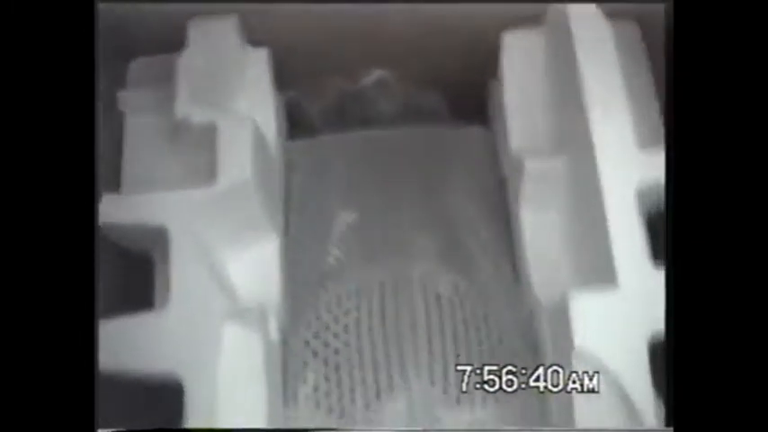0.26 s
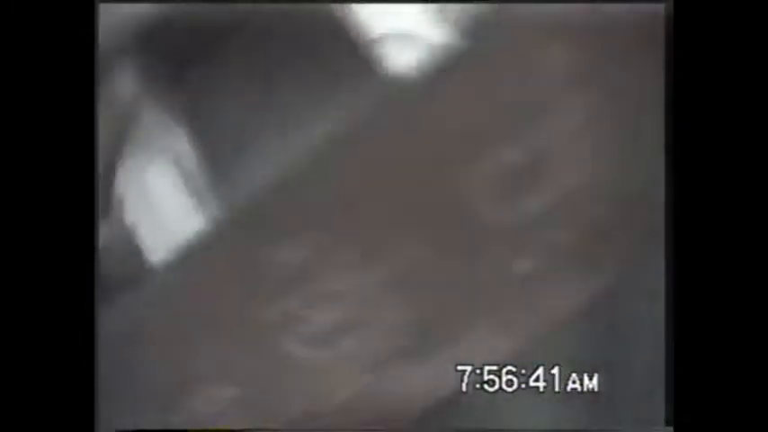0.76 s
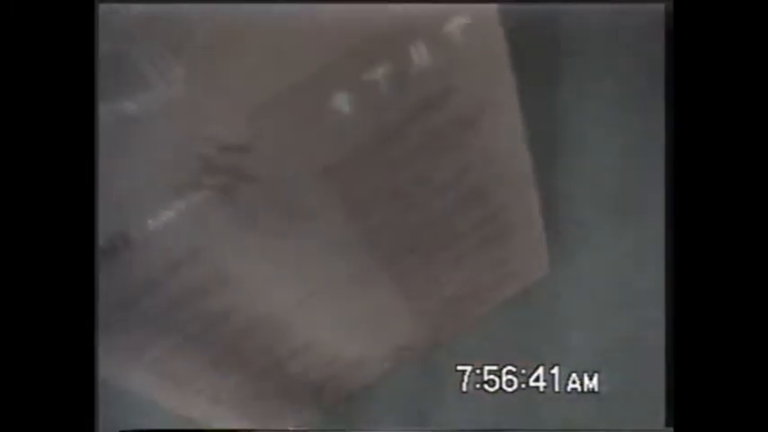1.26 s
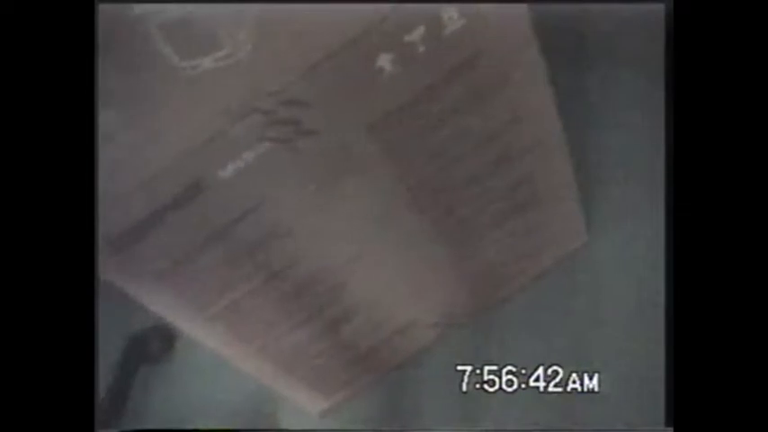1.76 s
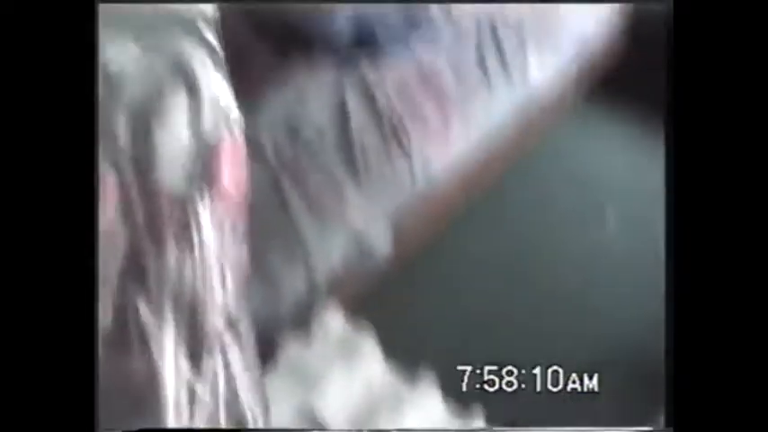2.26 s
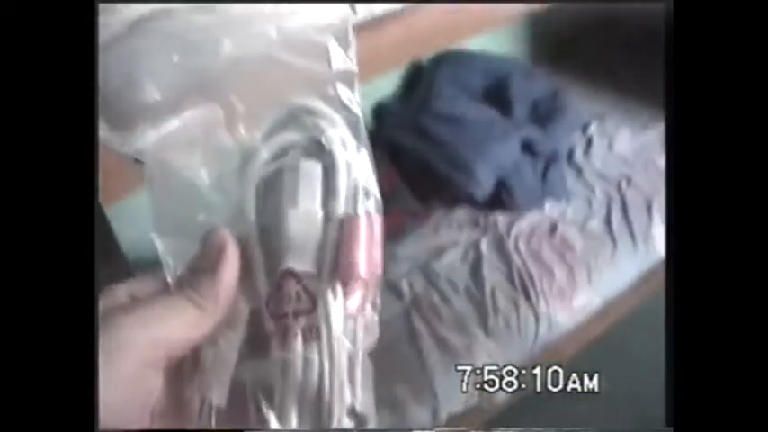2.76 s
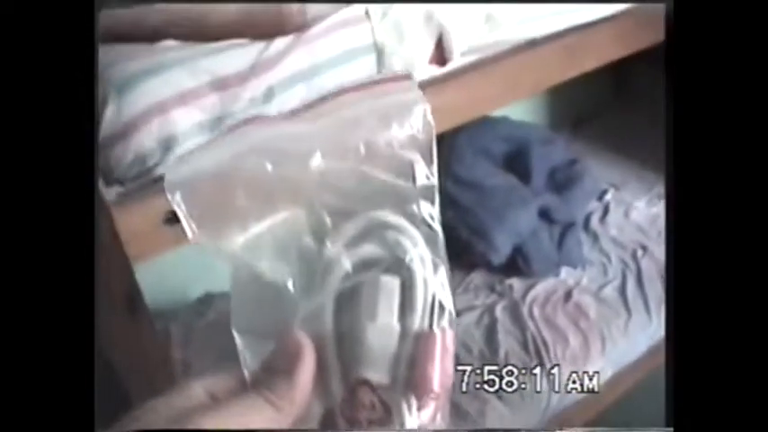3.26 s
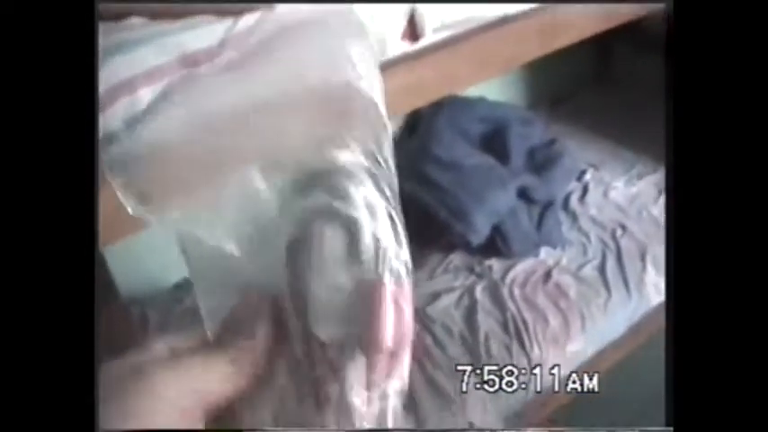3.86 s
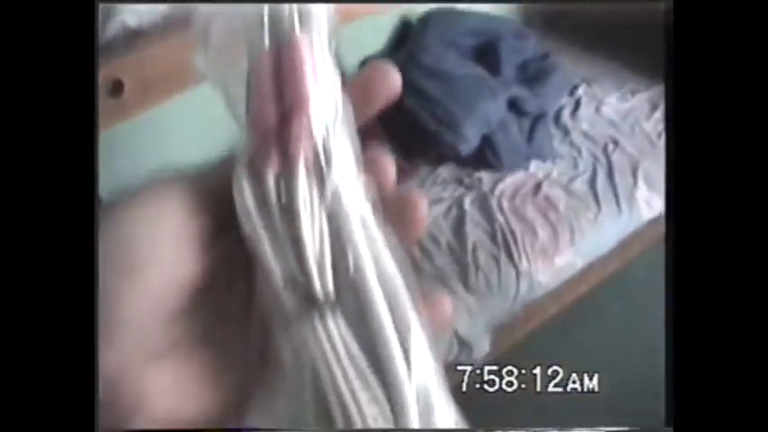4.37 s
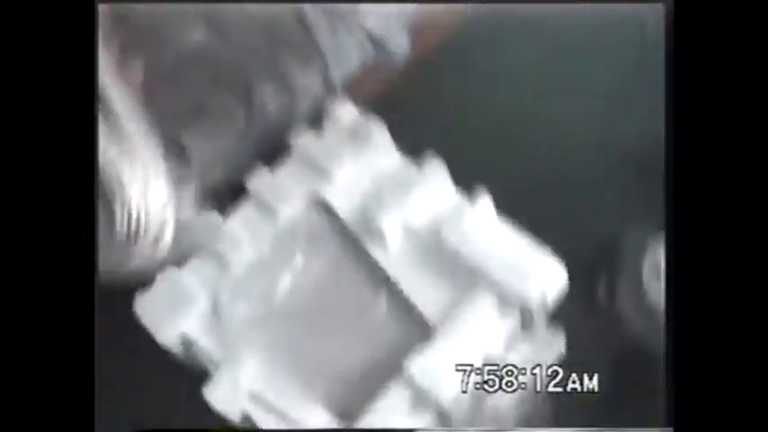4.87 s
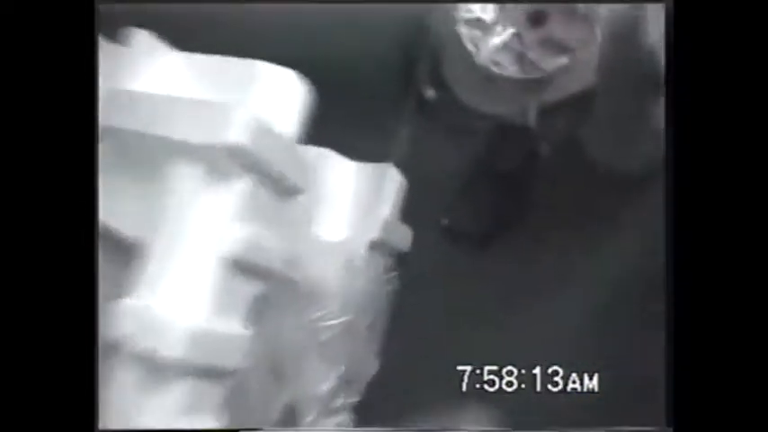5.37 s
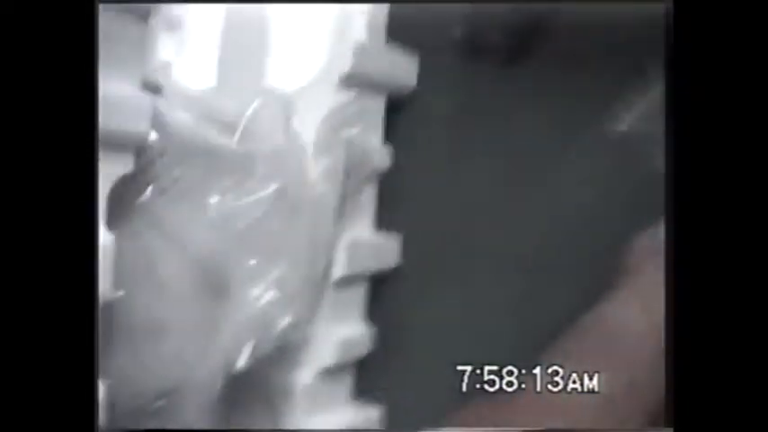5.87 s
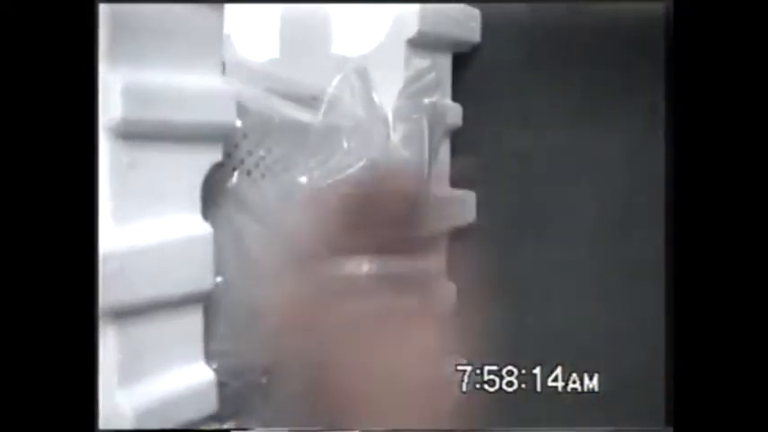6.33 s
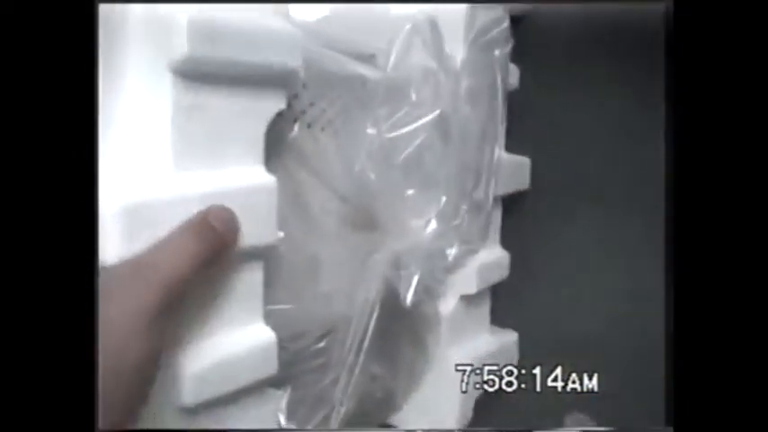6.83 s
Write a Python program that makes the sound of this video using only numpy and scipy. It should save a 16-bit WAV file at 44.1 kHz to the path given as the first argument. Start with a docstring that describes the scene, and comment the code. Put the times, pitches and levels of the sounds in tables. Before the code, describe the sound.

Close handling in a dead bedroom: hissy foam rubs, crisp plastic crinkles in bursts, small hollow foam knocks, with camera hum beneath, right side only.

```python
"""In a short, dead bedroom, hands unpack foam blocks, a cardboard box and a plastic bag of cables near a camcorder.
Random slips drive foam hiss, bag crinkle and dull box scrapes; cracks of shaped noise make the bag snap.
Decaying modes make hollow block thuds, swelling low tones the soft bumps, wavering lines the drive whine.
One microphone feeds the right channel, which carries a fixed offset; the left holds only crackly line hiss."""
import sys
import numpy as np
from scipy import signal
from scipy.fft import rfft, irfft
from scipy.io import wavfile
from scipy.ndimage import uniform_filter1d

SR = 44100
rng = np.random.default_rng(int(sys.argv[2]) if len(sys.argv) > 2 else 0)


def nominal_scale(level):
    """Amplitude ratio for a level in decibels (scalar or array-like)."""
    x = np.asarray(level, float) / 20
    return 10 ** x


def inscribe(sig):
    """Save sig as 16-bit PCM at rate SR to the path in sys.argv[1].

    A 1-D sig is mono; a 2-D sig holds one channel per row.
    Samples are clipped to [-1, 1] before scaling.
    """
    pcm = np.round(np.clip(np.atleast_2d(sig).T, -1, 1) * 32767)
    wavfile.write(sys.argv[1], SR, pcm.astype(np.int16))


N = 313110

# Source levels are those of one side, before the two equal sides sum.
# Spectra, relative: f/Hz, level/dB
LINE_SPECTRUM = [(20, -28), (60, -51), (120, -6), (600, -23), (2000, -7), (5000, 2.5), (9000, 4),
                 (16000, 5)]  # open left input
ROOM_SPECTRUM = [(12, 8), (60, 0.5), (96, -2), (125, -16.5), (170, -21.5), (250, -10.5), (400, -17),
                 (700, -26), (1500, -16.5), (2400, -30.5), (3100, -24.5), (5000, -56), (12000, -26),
                 (16000, -27)]  # even rumble and hiss
TICK_SPECTRUM = [(120, -26), (230, 4), (400, 1.5), (1500, -5.5), (4000, -19)]  # faint low ticks of the mechanism
BRIGHT_FOAM_SPECTRUM = [(1500, -17), (3000, -7), (3900, 4.5), (4900, 3), (7500, 9), (10000, 7.5),
                        (11500, 2.5), (13000, 0.5), (15800, -8)]  # foam near by
DULL_FOAM_SPECTRUM = [(1500, -8.5), (4000, -12.5), (4800, 3), (6500, 3), (9500, 5.5), (11200, -1.5),
                      (12200, -3.5), (16000, -14)]  # duller foam, its treble ending lower
FILM_SPECTRUM = [(1500, -30), (3000, -6), (4900, 3), (7500, 7.5), (10000, 3.5), (11500, -1.5), (12600, -9),
                 (16000, -24)]  # treble of the bag
BAG_SPECTRUM = [(500, -20), (1100, 2), (2000, 4.5), (3500, 4), (5000, 2), (9000, -9.5), (15000, -30)]  # mid body of the squeezes
CARD_SPECTRUM = [(250, -23), (450, 10), (1100, 12.5), (2000, 9.5), (3500, 9.5), (6000, 7), (9000, -35)]  # mid body of the rubs
BOX_SPECTRUM = [(60, -14), (120, -4.5), (190, 2), (330, 5), (700, 6.5), (1200, -2.5), (2500, -41.5)]  # dull scrape of the box
# Modes of the hollow block, before the pitch factor: f/Hz, level/dB
BLOCK_MODES = [(150, -9), (230, 1), (320, -2.5), (420, 0), (700, -2)]
# Lines of the tape drive: f/Hz
WHINE_HZ = [1078, 1620, 3036]
# Slow swell of the whine: t/s, then level/dB of each line
WHINE_SWELL = [(0, -66, -71.5, -83), (1.5, -70, -71, -75), (2.6, -70.5, -71.5, -75.5),
               (3.5, -73.5, -70, -74.5), (4.2, -74, -73, -70), (4.55, -72, -70, -77.5),
               (5.9, -80, -71.5, -75), (7.1, -77, -81, -83)]
# Soft low bumps of the hand on the camcorder or bag: centre t/s, level/dB, f/Hz
BUMPS = [(0.546, -51.5, 250), (1.832, -59, 271), (1.93, -55, 197), (2.188, -55, 217), (2.325, -51.5, 130),
         (2.369, -61, 171), (3.647, -46, 159), (3.697, -54, 200), (3.724, -51, 187), (3.849, -51.5, 226),
         (3.862, -46, 152), (3.886, -49, 197), (4.051, -51.5, 175), (4.086, -54, 159)]
# Foam blocks set down or bumped: t/s, level/dB, t60/s of the 230 Hz mode, pitch factor (higher: smaller block)
THUDS = [(0.576, -37.5, 0.034, 2.58), (1.911, -40.5, 0.019, 2.13), (2.138, -43.5, 0.054, 1.27),
         (5.535, -27, 0.0053, 2.7), (6.216, -34.5, 0.041, 1.28), (6.233, -42.5, 0.2, 0.95),
         (6.528, -43, 0.026, 2.7), (7.002, -37, 0.043, 1.32)]
# Creases of the bag popping: t/s, crack peak level/dB, centre f/Hz,
# floor level/dB below and above the centre, relative to it (positive counts as 0)
SNAPS = [(2.054, -36.5, 950, -6, -40), (2.0668, -39, 4380, 3, -25), (2.0785, -39, 1240, 1, -21),
         (2.138, -34.5, 1730, -12, -10), (2.147, -40, 1550, -12, -5), (2.171, -41, 8030, -5, -10),
         (2.3466, -30, 8960, -2.5, -10), (2.371, -33, 5770, 3, -17), (2.633, -53, 1100, -12, -8),
         (2.6407, -40, 1930, -14, -16), (2.679, -34.5, 1930, -8, -21), (2.684, -36.5, 2100, 2, -20),
         (2.7034, -52, 2680, -8, -14), (2.7313, -40, 6640, 9, -25), (2.7333, -25.5, 3850, 6, -32),
         (2.7738, -38, 890, -10, -20), (2.8188, -29.5, 2600, 0, -5), (3.009, -39.5, 1910, 1, -14),
         (3.454, -40.5, 1600, -1, -11), (3.5957, -33, 980, 1, -22), (3.6106, -27, 5700, -4, 3),
         (3.6145, -27.5, 8960, -1, -10), (3.6242, -29, 4640, 0, -7), (3.627, -34, 2680, -7, -5),
         (3.6374, -27, 7190, -10, -14), (3.65, -30, 10000, -6, -10), (3.655, -26, 8030, -4, -10),
         (3.661, -29, 1930, -4, -13), (3.6768, -23, 3720, 0, -6), (3.6869, -26.5, 6450, -2, -9),
         (3.6918, -46, 2400, -12, -12), (3.699, -34, 3720, 0, -14), (3.709, -25.5, 4200, -7, -11),
         (3.7188, -25, 4640, 0, -20), (3.7365, -27, 7840, -7, -10), (3.7493, -25, 2970, 0, -9),
         (3.805, -31, 7060, -1, -26), (3.8117, -26, 7140, 0, -21), (3.8413, -36, 1240, -8, -17),
         (3.854, -25, 2950, -7, -17), (3.865, -24.5, 3300, 1.5, -11), (3.8717, -27, 8960, -14, -10),
         (3.888, -25.5, 2620, -10, -21), (3.8987, -25.5, 2660, -2, -18), (3.9164, -27, 8850, -9, -10),
         (3.935, -27.5, 6450, 0, -17), (3.952, -37, 2150, -6, -15), (3.9576, -30, 3330, -8, -20),
         (3.9721, -24.5, 2990, -10, -5), (3.977, -27, 1970, -1.5, -25), (3.9806, -44, 1940, 1, -21),
         (4.0102, -29, 2400, -4, -8.5), (4.079, -28.5, 5860, -8, -1), (4.089, -24, 2650, 3.5, -12),
         (4.1022, -41, 886, -14, -27), (4.1062, -39, 6450, -5, -19), (4.1149, -29, 1930, -2, -2),
         (4.1694, -44, 1130, -18, -20), (4.4002, -46, 2680, 4, -20), (4.5159, -48, 1930, -15, -13),
         (4.7466, -37, 1730, -17, -21), (4.7567, -34.5, 2400, -16, -12), (4.9479, -33.5, 1680, -5, -28),
         (4.9522, -33, 4150, -1, -21), (4.976, -30, 1560, -17, -9), (5, -33.5, 4150, -12, -19),
         (5.0105, -46, 3720, -9, -8), (5.0125, -49, 4150, 0, -17), (5.024, -33, 2150, -13, -16),
         (5.0661, -35.5, 1390, -17, -21), (5.1115, -26, 2700, -15, -9), (5.1246, -46, 4640, -8, -5),
         (5.2117, -31, 1390, -14, -10), (5.218, -31, 5170, 0, -17), (5.237, -33, 3330, -20, -1),
         (5.2508, -30, 5600, -1, -3), (5.255, -30, 10000, -20, -10), (5.27, -26, 1950, -18, -19),
         (5.278, -29, 3000, -10, -11), (5.281, -28, 2150, -14, -14), (5.294, -30, 2150, -8, -14),
         (5.309, -34, 1240, -11, -12), (5.347, -27.5, 7190, 1, -22), (5.3662, -29.5, 8960, -9, -10),
         (5.377, -37, 2990, -3, -10), (5.3858, -28.5, 2670, 2, -12), (5.4555, -30.5, 7190, -8, -4),
         (5.4636, -26.5, 2430, -23, -27), (5.4969, -27, 7900, 1, -11), (5.5334, -26.5, 2860, -16, -20),
         (5.5817, -40, 1110, -17, -36), (5.6684, -29, 2680, -14, -15), (5.6996, -25, 4700, -10, -11),
         (5.781, -28, 2400, -12, 3), (5.839, -30, 3330, -4, -6.5), (6.2275, -32, 8140, -24, -8),
         (6.213, -37, 3900, -12, 1), (6.3653, -38, 8100, -9, -10), (6.595, -30.5, 6400, -6, -11)]
# Smooth rubs on foam and card: peak t/s, rise/s, fall/s, foam level/dB, card level/dB
RUBS = [(.1, 0.6, 0.25, -55, -54.5), (.46, 0.27, 0.12, -46.5, -46.5), (.74, 0.038, 0.033, -53, -56),
        (.86, 0.11, 0.076, -48, -58), (.97, 0.062, 0.087, -49, -56), (1.16, 0.13, 0.033, -59, -56.5),
        (1.27, 0.12, 0.07, -48, -49.5), (1.62, 0.24, 0.2, -54, -60), (6.222, 0.02, 0.023, -33, -41.5),
        (6.25, 0.067, 0.062, -49, -53.5), (6.378, 0.024, 0.081, -42, -60.5),
        (6.471, 0.026, 0.028, -38, -54.5), (6.54, 0.037, 0.028, -44.5, -58), (6.6, 0.017, 0.11, -44, -50),
        (6.73, 0.079, 0.04, -42, -44.5), (6.785, 0.14, 0.047, -34.5, -42.5), (6.83, 0.036, 0.058, -43, -50),
        (6.92, 0.16, 0.43, -42, -44.5), (7.03, 0.055, 0.062, -31, -42)]
# Coarse squeezes of the bag: peak t/s, rise/s, fall/s, film level/dB, bag level/dB
SQUEEZES = [(2.07, 0.063, 0.082, -80, -55.5), (2.16, 0.12, 0.029, -80, -57.5),
            (2.43, 0.053, 0.12, -78, -56), (2.64, 0.034, 0.02, -70, -53), (2.71, 0.083, 0.038, -58, -51.5),
            (2.745, 0.038, 0.068, -64, -53.5), (3.0, 0.011, 0.079, -55.5, -63),
            (3.62, 0.058, 0.022, -48, -48), (3.655, 0.016, 0.016, -50, -42),
            (3.695, 0.014, 0.081, -52, -46), (3.87, 0.08, 0.12, -49.5, -43.5),
            (3.97, 0.047, 0.071, -57, -50), (4.1, 0.016, 0.066, -77, -59), (4.76, 0.079, 0.19, -60, -54),
            (5.02, 0.17, 0.11, -52, -47.5), (5.12, 0.14, 0.079, -48.5, -48.5),
            (5.28, 0.15, 0.077, -42.5, -43.5), (5.38, 0.15, 0.063, -56, -45.5),
            (5.5, 0.025, 0.075, -56, -51), (5.674, 0.037, 0.029, -41, -43.5),
            (5.705, 0.031, 0.032, -38.5, -39), (5.78, 0.085, 0.1, -47, -42.5)]
# Faint rustle between the strokes: t/s, foam level/dB, bag level/dB, box level/dB
RUSTLE = [(0, -55.5, -78, -68), (.55, -62, -60, -55), (.7, -59.5, -58, -61.5), (1.4, -59.5, -63, -69),
          (1.85, -65, -62, -64), (2.35, -65.5, -62, -63), (2.6, -65, -63.5, -69), (3.1, -65, -60.5, -69),
          (3.54, -66.5, -64.5, -70), (3.78, -61, -51.5, -57), (4.23, -65.5, -63.5, -73.5),
          (4.7, -64.5, -62.5, -60.5), (5.2, -89, -67, -69), (5.58, -59, -56, -65), (5.95, -62, -65, -79),
          (6.3, -65, -63.5, -65), (7.1, -51, -43.5, -86)]

LINE_DB, ROOM_DB, TICKS_DB = -62, -54, -66  # rms
OFFSET = -.2655  # fraction of full scale
BUMP_S = 0.01
SNAP_T60_S, SNAP_PUSH_DB, PUSH_SPREAD_DB = 0.0053, -21, 9
FLUTTER_DB, FLUTTER_T60_S = -16, 0.028  # the film flutters on after each pop
BRIGHT_FOAM_S = 1.9  # the foam sounds duller before this time, brighter after it
RUB_BOX_DB, SQUEEZE_BOX_DB = -15.5, -9.5  # the box sounds along, relative to the mid body
RUB_GRAIN_DB, SQUEEZE_GRAIN_DB, RUB_HISS = 0.6, 2.2, 1.2  # spread of slip sizes; smooth share
RUB_ROUND, SQUEEZE_ROUND = 2.6, 1.5  # a rub holds its level, then drops off; a squeeze comes to a point
EDGE_DB = -20  # level of a stroke one rise before and one fall after its peak, relative to the peak


def evened(x):
    """Normalization: scales to rms 1."""
    return x / np.sqrt(np.mean(x ** 2) + 1e-20)


def read(points, hz):
    """Interpolation of a spectrum on a logarithmic frequency axis."""
    f, value = np.transpose(points)
    return np.interp(np.log(hz + 1), np.log(f + 1), value)


def colour(x, points):
    """Minimum-phase filtering: the phase follows from the log gain by the Hilbert transform."""
    log_gain = np.log(nominal_scale(read(points, abs(np.fft.fftfreq(8192, 1 / SR)))))
    response = np.exp(np.conj(signal.hilbert(log_gain)))
    taps = np.fft.ifft(response).real[:4096]
    return evened(signal.oaconvolve(x, taps)[:N])


def patchy(x, patchy_db, size):
    """Random modulation: narrow bands of the sound come and go by chance."""
    z = signal.stft(x, nperseg=size)[2]
    patches = uniform_filter1d(rng.standard_normal(z.shape), size=3, axis=0)
    patches = evened(uniform_filter1d(patches, size=4, axis=1))
    return evened(signal.istft(z * nominal_scale(patchy_db * patches), nperseg=size)[1][:N])


def grains(per_s, spread_db, burst_ms):
    """Granular noise: tiny bursts at random moments, a few of them much larger."""
    happens = rng.random(N) < per_s / SR
    sizes = nominal_scale(spread_db * np.minimum(rng.exponential(1, N), 5)) * happens
    burst_power = np.exp(-np.arange(600) / (burst_ms * SR / 1000))
    power = abs(signal.oaconvolve(sizes ** 2, burst_power)[:N])
    return np.sqrt(power) * rng.standard_normal(N)


def steady_gain(x):
    """Local power normalization: evens the slow level of a grain stream of changing coarseness."""
    return x / np.sqrt(abs(uniform_filter1d(x ** 2, size=6000)) + 1e-12)


def line_hiss():
    """Circuit noise: random grains over steady hiss make the open input crackle."""
    crackle = grains(per_s=2500, spread_db=4.0, burst_ms=.1)
    hiss = colour(crackle + 1.1 * rng.standard_normal(N), LINE_SPECTRUM)
    return nominal_scale(LINE_DB) * hiss


def bedroom(x):
    """Diffuse reverberation: sparse reflections of random sign die out in a short, dead room."""
    decay = nominal_scale(-60 * np.arange(6000) / SR / 0.073)  # t60 in s
    taps = rng.choice([-1., 1.], 6000) * (rng.random(6000) < .05) * decay
    delay = np.zeros(130)
    return signal.oaconvolve(x, np.r_[delay, taps / np.linalg.norm(taps)])[:N]


def whine(wobble):
    """Phase and amplitude modulation: lines wander in phase and waver around a slow swell."""
    t = np.arange(N) / SR
    s, *levels_db = np.transpose(WHINE_SWELL)
    shape = (len(WHINE_HZ), N)
    wander = wobble * np.cumsum(rng.standard_normal(shape), 1)  # wobble in rad per sample
    waver_db = 2.5 * evened(uniform_filter1d(rng.standard_normal(shape), size=2500))
    out = np.zeros(N)
    for hz, db, phase, waver in zip(WHINE_HZ, levels_db, wander, waver_db):
        level = np.sqrt(2) * nominal_scale(np.interp(t, s, db) + waver)
        out += level * np.sin(2 * np.pi * hz * t + phase)
    return out


def camcorder():
    """Superposition of machine noises: even rumble and hiss, drive whine and faint low ticks."""
    hiss = patchy(colour(rng.standard_normal(N), ROOM_SPECTRUM), patchy_db=1.5, size=2048)
    ticks = colour(grains(per_s=60, spread_db=1.4, burst_ms=7.0), TICK_SPECTRUM)
    return nominal_scale(ROOM_DB) * hiss + nominal_scale(TICKS_DB) * ticks + whine(wobble=0.01)


def bumps():
    """Gaussian tone pulses: a few cycles of a low tone under a smooth swell."""
    t = np.arange(N) / SR
    out = np.zeros(N)
    for s, db, hz in BUMPS:
        swell = np.exp(-((t - s) / BUMP_S) ** 2)
        out += nominal_scale(db) * swell * np.sin(2 * np.pi * hz * (t - s))
    return out


def thuds():
    """Modal decay: a struck block rings low and hollow; its higher modes die sooner."""
    out, t = np.zeros(N + 8000), np.arange(8000) / SR
    for s, db, t60, pitch in THUDS:
        ring = np.zeros(8000)
        for hz, mode_db in BLOCK_MODES:
            decay = nominal_scale(mode_db - 60 * t / t60 * hz / 230)
            ring += decay * np.sin(2 * np.pi * hz * pitch * t)
        out[round(s * SR):][:8000] += nominal_scale(db) * ring * np.minimum(t / 0.00097, 1)
    return out[:N]


def snaps():
    """Impulsive buckling: each crease gives a broad crack with a favoured band and a small low push."""
    out, t = np.zeros(N + 4000), np.arange(3000) / SR
    hz = np.fft.rfftfreq(3000, 1 / SR)
    decay = nominal_scale(-60 * t / SNAP_T60_S) + nominal_scale(FLUTTER_DB - 60 * t / FLUTTER_T60_S)
    envelope = decay * np.minimum(t / .0008, 1) ** 2
    for s, db, centre_hz, low_db, high_db in SNAPS:
        floor_db = np.where(hz < centre_hz, min(low_db, 0), min(high_db, 0))
        shape_db = np.maximum(-14 * np.log2((hz + 1) / centre_hz) ** 2, floor_db)
        shape_db = shape_db - 30 * (hz < 450) - 2.5 * np.maximum(hz / 1000 - 10.5, 0)
        crack = irfft(rfft(rng.standard_normal(3000)) * nominal_scale(shape_db)) * envelope
        push_db = SNAP_PUSH_DB + PUSH_SPREAD_DB * np.tanh(rng.standard_normal())
        push = nominal_scale(push_db - 60 * t / 0.015) * np.sin(2 * np.pi * 200 * t)
        out[round(s * SR):][:3000] += nominal_scale(db) * (crack / abs(crack).max() + push)
    return out[:N]


def strokes(rows, roundness):
    """Power addition: treble and mid power of strokes, each with one rounded rise and fall."""
    t, power = np.arange(0, N + 64, 64) / SR, 1e-12
    for peak, rise, fall, *level_db in rows:
        away = np.where(t < peak, (peak - t) / rise, (t - peak) / fall)
        shape_db = np.maximum(EDGE_DB * away ** roundness, -90)
        power = power + nominal_scale(np.c_[level_db] + shape_db) ** 2
    return np.array([np.interp(np.arange(N), t * SR, p) for p in power])


def handling():
    """Friction: the same hands rub foam, film, bag, card and box; coarse contact makes larger slips."""
    s, *columns = np.transpose(RUSTLE)
    foam_rustle, bag_rustle, box_rustle = [nominal_scale(np.interp(np.arange(N) / SR, s, c)) ** 2 for c in columns]
    rub_treble, rub_mid = rub = strokes(RUBS, RUB_ROUND)
    squeeze_treble, squeeze_mid = squeeze = strokes(SQUEEZES, SQUEEZE_ROUND)
    coarse = squeeze.sum(0) / (squeeze.sum(0) + rub.sum(0))
    grain_db = RUB_GRAIN_DB + (SQUEEZE_GRAIN_DB - RUB_GRAIN_DB) * coarse

    # one stream of slips drives all surfaces, so they flicker together
    smooth = RUB_HISS * (1 - coarse) * rng.standard_normal(N)
    slips = steady_gain(grains(per_s=1800, spread_db=grain_db, burst_ms=.6) + smooth)
    # random signs: same flicker, unrelated waves
    own = slips * rng.choice([-1., 1.], (6, N))

    dull, bright = colour(own[0], DULL_FOAM_SPECTRUM), colour(own[1], BRIGHT_FOAM_SPECTRUM)
    foam = np.where(np.arange(N) < BRIGHT_FOAM_S * SR, dull, bright)
    foam = patchy(foam, patchy_db=3, size=512)
    film = patchy(colour(own[2], FILM_SPECTRUM), patchy_db=2.5, size=256)
    bag = patchy(colour(own[3], BAG_SPECTRUM), patchy_db=2, size=256)
    card = patchy(colour(own[4], CARD_SPECTRUM), patchy_db=2.5, size=1024)
    box = colour(own[5] + 0.74 * rng.standard_normal(N), BOX_SPECTRUM)

    box_power = nominal_scale(RUB_BOX_DB) ** 2 * rub_mid + nominal_scale(SQUEEZE_BOX_DB) ** 2 * squeeze_mid
    out = np.sqrt(foam_rustle + rub_treble) * foam
    out += np.sqrt(squeeze_treble) * film
    out += np.sqrt(bag_rustle + squeeze_mid) * bag
    out += np.sqrt(rub_mid) * card
    out += np.sqrt(box_rustle + box_power) * box
    return out


def scene():
    """Superposition: one close sound field, alike on both sides."""
    near = handling() + snaps() + thuds() + bumps()
    field = near + nominal_scale(-11) * bedroom(near) + camcorder()
    return np.tile(field, (2, 1))


def band_limit(x):
    """A steep low-pass at the top of the band."""
    return signal.sosfilt(signal.butter(12, 15880, fs=SR, output="sos"), x)


def record(dry):
    """Linear summation: both sides add in the right channel with an offset; the left has line hiss."""
    right = dry.sum(0) + OFFSET
    return band_limit(np.array([line_hiss(), right]))


dry = scene()
out = record(dry)
inscribe(out)
```